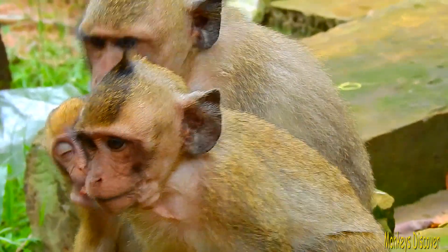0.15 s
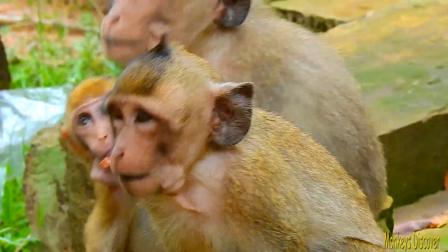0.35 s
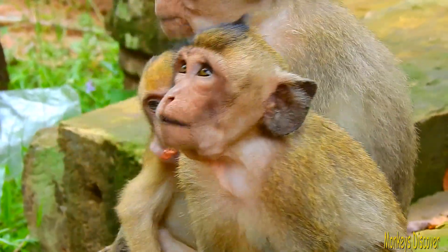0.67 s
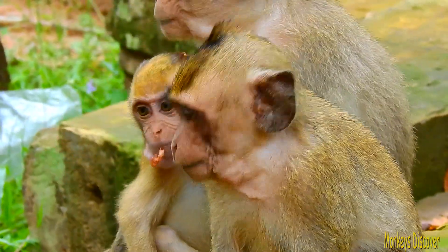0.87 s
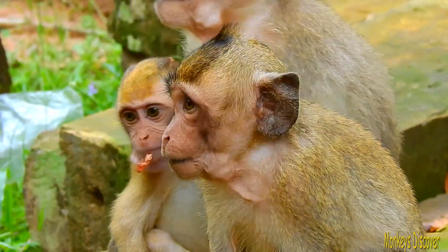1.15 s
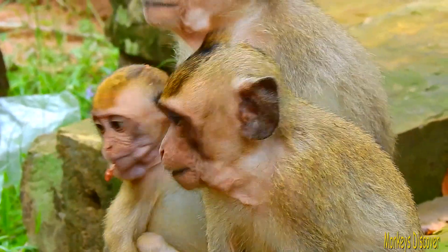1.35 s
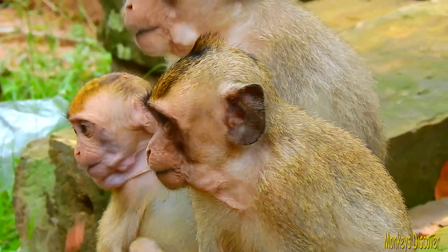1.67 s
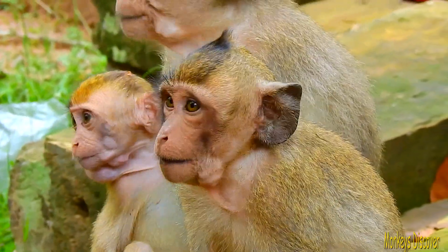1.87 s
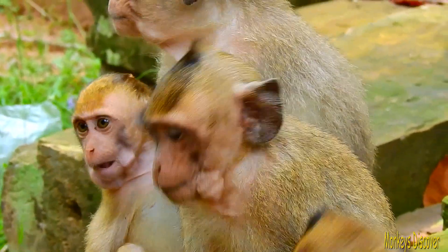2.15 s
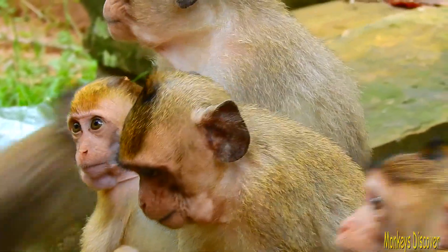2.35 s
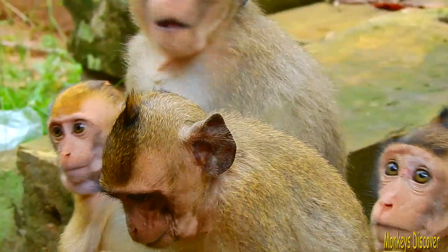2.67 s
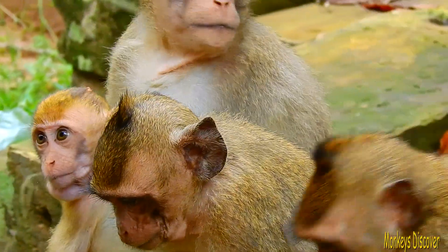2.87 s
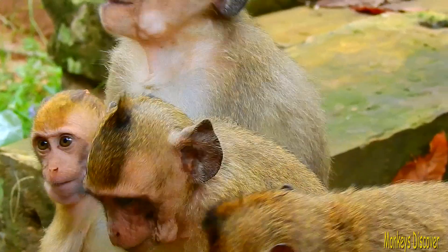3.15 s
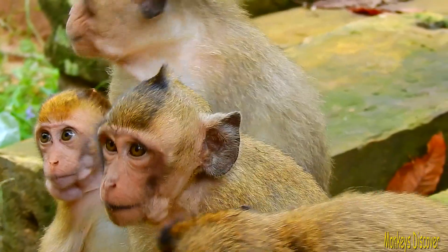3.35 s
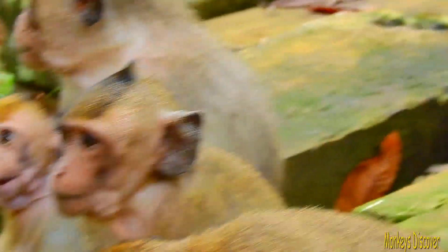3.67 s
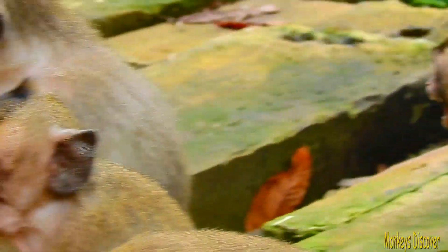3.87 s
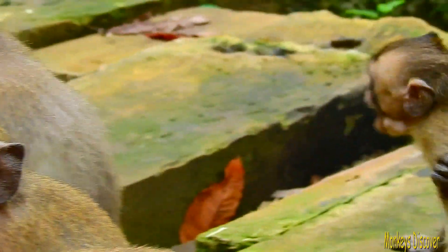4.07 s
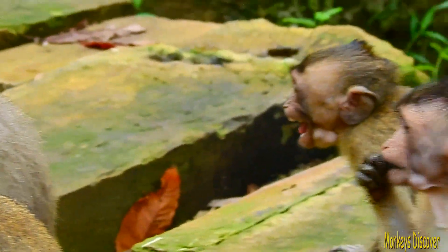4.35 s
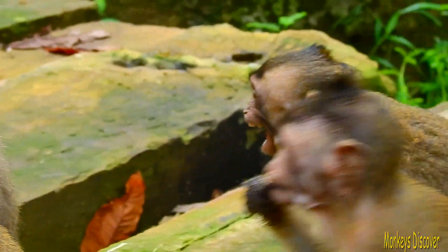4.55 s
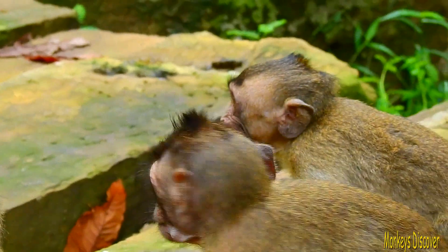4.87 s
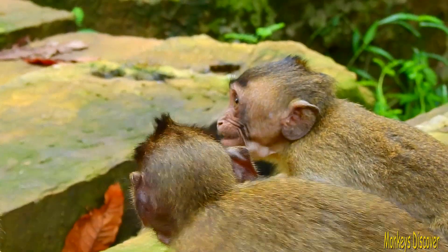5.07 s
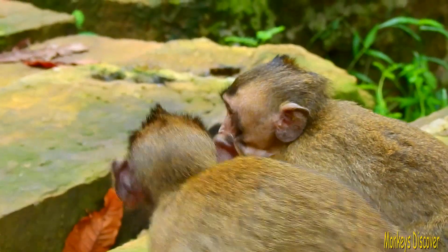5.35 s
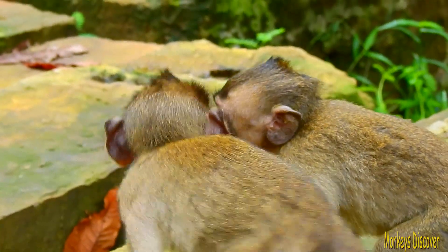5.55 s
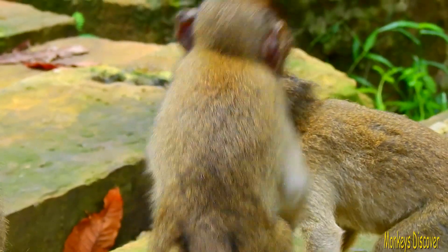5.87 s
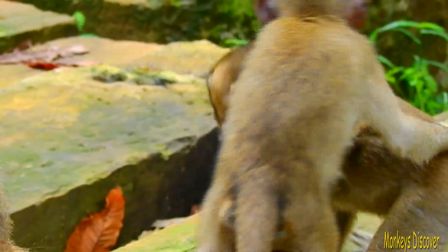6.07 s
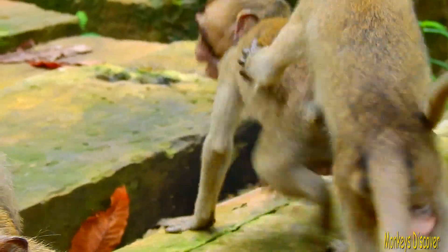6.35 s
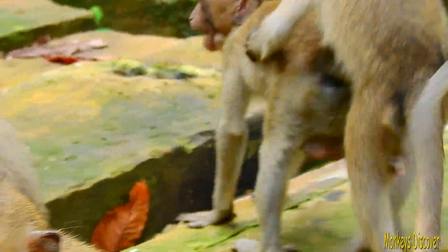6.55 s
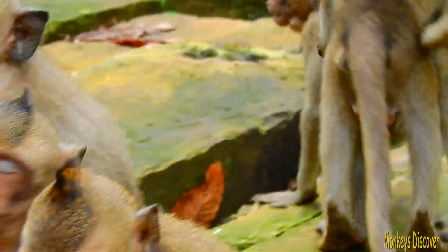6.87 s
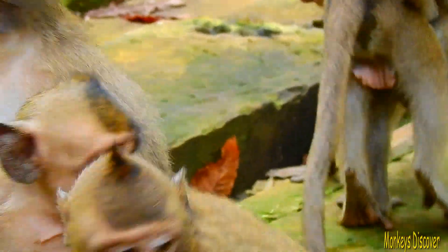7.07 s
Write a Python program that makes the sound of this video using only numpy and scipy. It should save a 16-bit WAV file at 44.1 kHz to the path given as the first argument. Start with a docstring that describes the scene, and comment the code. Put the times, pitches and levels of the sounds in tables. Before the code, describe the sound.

Shrill, wavering monkey squeals grow louder, joined by brief lower calls and light taps, above a distant hum and open-air hiss.

```python
"""Macaques among stone slabs

Young macaques squeal on the right: fast vocal folds give a wavering high whistle, strong-weak cycles
add a half line, chaotic vibration a throaty rasp. Others coo and grunt in the middle, where feet and
hands tap the stone. A far engine idles over open-air hiss; walls and trees give the calls a faint tail."""
import sys
import numpy as np
from scipy import signal
from scipy.fft import rfft, irfft
from scipy.io import wavfile
from scipy.ndimage import uniform_filter1d

SR = 44100
rng = np.random.default_rng(int(sys.argv[2]) if len(sys.argv) > 2 else 0)


def persist_wave(psi):
    """Save psi, clipped to +-1, as 16-bit WAV."""
    counts = np.round(np.clip(psi, -1, 1) * 32767).astype(np.int16)
    wavfile.write(sys.argv[1], SR, np.atleast_2d(counts).T)


N = 317520
TIME_S = np.arange(N) / SR


def from_db(db):
    """Level to gain."""
    return 10 ** (np.asarray(db) / 20)


def rms_one(x):
    """Scale to rms 1."""
    return x / np.sqrt(np.mean(x ** 2) + 1e-20)


def butter(x, order, hz, kind):
    """Butterworth filter."""
    return signal.sosfilt(signal.butter(order, hz, kind, fs=SR, output="sos"), x)


def curves(rows):
    """Rows of (t/s, values...) to one curve per value."""
    times_s, *columns = np.transpose(rows)
    return [np.interp(TIME_S, times_s, column) for column in columns]


def phrases(tables, fade_s):
    """Gate, open during each phrase, and the phrases' curves."""
    gate = np.zeros(N)
    for rows in tables:
        gate[round(rows[0][0] * SR) - 50:round(rows[-1][0] * SR) + 50] = 1
    rows = np.concatenate(tables)
    order = np.argsort(rows[:, 0], kind="stable")
    return uniform_filter1d(gate, max(int(fade_s * SR), 1)), curves(rows[order])


def drift(rate_hz):
    """Low-passed noise, rms 1."""
    r = np.exp(-2 * np.pi * rate_hz / SR)
    return rms_one(signal.lfilter([1], [1, -2 * r, r * r], rng.standard_normal(N + SR))[SR:])


def resonate(x, modes, passes=1):
    """Parallel resonances (f/Hz, width/Hz, level/dB) of alternating sign; more passes, steeper skirts."""
    out = 0
    for k, (hz, width_hz, db) in enumerate(modes):
        r = np.exp(-np.pi * width_hz / SR)
        b = (1 - r * r) / 2 * np.array([1, 0, -1])
        a = [1, -2 * r * np.cos(2 * np.pi * hz / SR), r * r]
        out = out + (-1) ** k * from_db(db) * signal.lfilter(b, a, x)
    return out if passes == 1 else resonate(out, modes, passes - 1)


def moving_band(x, hz, width_hz, order=2):
    """Band round a moving centre: shift to zero, low-pass, shift back; rms 1."""
    carrier = np.exp(2j * np.pi * np.cumsum(hz) / SR)
    baseband = butter(x / carrier, order, width_hz / 2, "low")
    return rms_one(np.real(baseband * carrier))


def partials(hz, lines):
    """Sines on a pitch; lines are (multiple, rms level/dB)."""
    phase = 2 * np.pi * np.cumsum(hz) / SR
    return sum(np.sqrt(2) * from_db(db) * (k * hz < .45 * SR) * np.sin(k * phase) for k, db in lines)


# f/Hz, relative density/dB
AIR_SPECTRUM = [(18, -44), (30, -2), (140, 3), (197, -5.5), (284, -5), (467, -18), (561, -17), (728, -6),
                (830, -19.5), (1230, -23), (3320, -24.5), (4540, -22), (5590, -30.5), (15500, -51)]
# f/Hz, left-right correlation
AIR_CORRELATION = [(60, 0.99), (240, 0.99), (950, 0.9), (3770, 0.36), (15000, -0.03)]


def air(level_db=-43, flicker_db=.8):
    """Far traffic, leaves and insects: stereo noise in flickering half-octave bands."""
    out, edges_hz = 0, 30 * 2 ** np.arange(0, 9.3, .5)
    white = rng.standard_normal((2, 2, N))
    flicker = [drift(31), drift(18), drift(17)]
    tables = np.transpose(AIR_SPECTRUM), np.transpose(AIR_CORRELATION)
    for k, (low, high) in enumerate(zip(edges_hz, edges_hz[1:])):
        mid, side = butter(white[k % 2], 3, [low, high], "band")
        centre_hz = np.sqrt(low * high)
        db, alike = [np.interp(np.log(centre_hz), np.log(hz), values) for hz, values in tables]
        alike = np.clip(alike, 0, 1)
        pair = np.sqrt(1 + alike) * mid + np.sqrt(1 - alike) * side * [[1], [-1]]
        out = out + from_db(db + flicker_db * flicker[k % 3]) * pair
    return from_db(level_db) * rms_one(out)


# f/Hz, width/Hz, level/dB
INSECT_BAND = [(4620, 1000, -60)]


def insects():
    """Far chorus blurred into one band of hiss, partly shared by the channels."""
    (hz, width_hz, db), = INSECT_BAND
    band = butter(rng.standard_normal((3, N)), 2, [hz - width_hz / 2, hz + width_hz / 2], "band")
    return from_db(db) * rms_one(1.2 * band[0] + band[1:])


# f/Hz, width/Hz, relative level/dB
HUM_MODES = [(554, 24, 0.5), (628, 24, -3), (835, 30, 3), (1035.5, 35, 1.5), (1178, 9.7, -32),
             (1697, 12, -0.5)]


def hum_tones(level_db=-58):
    """Faint tones: noise in narrow resonances, each fading in and out on its own."""
    white, swell_db = rng.standard_normal(N), 5 * np.tanh(drift(3))
    tones = sum(from_db(np.roll(swell_db, 40000 * k)) * resonate(white, [mode])
                for k, mode in enumerate(HUM_MODES))
    return from_db(level_db) * rms_one(tones)


# t/s, firing rate/Hz
ENGINE_RATE = [(0, 23.8), (.45, 23.4), (1.35, 24.3), (2.3, 23.6), (3.6, 24.1), (4.95, 23.5), (5.4, 23.9),
               (7.2, 23.4)]
# t/s, level/dB
ENGINE_LEVEL = [(0.0, -41), (0.82, -42.5), (1.26, -39), (2.57, -43.5), (3.05, -39.5), (3.47, -43.5),
                (4.51, -43), (4.911, -43.5), (5.5, -42.5), (6.56, -42), (6.72, -42.5), (7.2, -44)]
# f/Hz, width/Hz, gain per pass/dB
EXHAUST_MODES = [(131.5, 31.4, 0), (275, 50, -4), (392.1, 34.3, -6), (74.5, 48, -11)]


def engine():
    """Far idle: one slightly uneven pulse per firing rings the exhaust."""
    (rate_hz,), (level_db,) = curves(ENGINE_RATE), curves(ENGINE_LEVEL)
    firings = np.cumsum(rate_hz * (1 + .012 * drift(6))) / SR
    pulses = np.diff(np.floor(firings), prepend=0) * from_db(2.53 * rng.standard_normal(N))
    return from_db(level_db) * rms_one(resonate(pulses + 1e-18, EXHAUST_MODES, passes=2))


# f/Hz, level/dB, t60/s
STONE_MODES = [(1780, 0.5, 0.009), (1320, 5.5, 0.0066)]
# t/s, ring and grit gain/dB, thump gain/dB
CONTACTS = [(0.483, -35, -50), (0.511, -25, -50), (0.605, -46, -40.5), (0.674, -27.5, -45),
            (1.398, -21.5, -36.5), (1.725, -31.5, -45), (2.283, -29, -52), (2.886, -31.5, -42),
            (2.98, -36, -40), (3.128, -35, -45), (3.156, -23, -51), (3.171, -27, -27.5),
            (3.193, -21, -33.5), (3.208, -40, -32.5), (3.372, -41, -60), (3.464, -35, -52),
            (3.541, -30.5, -58), (3.936, -37, -72), (5.318, -30, -52), (5.562, -36, -46)]


def taps(thump_hz=548, thump_t60_s=.0084):
    """Hands and feet strike stone: short ring, grit and dull thump."""
    out, t = np.zeros(N + SR), np.arange(SR // 20) / SR
    ring = sum(from_db(db - 60 * t / t60) * np.sin(2 * np.pi * hz * t) for hz, db, t60 in STONE_MODES)
    decay = from_db(-60 * t / thump_t60_s)
    thump = from_db(19.5) * decay * np.sin(2 * np.pi * thump_hz * t)
    attack = 1 - np.exp(-t / .00082)   # padded skin, no hard edge
    grits = 1.74 * decay * butter(rng.standard_normal((len(CONTACTS), len(t))), 2, [900, 3500], "band")
    for (start_s, ring_db, thump_db), grit in zip(CONTACTS, grits):
        tap = from_db(ring_db) * (ring + grit) + from_db(thump_db) * thump
        out[round(start_s * SR):][:len(t)] += attack * tap
    return out[:N]


# start/s, attack/s, length/s, level/dB, drop by the end/dB, f/Hz
SCUFF_EVENTS = [(0.478, .014, 0.61, -47, 22, 1710), (1.148, 0.19, 0.28, -43.5, 20, 1800),
                (1.431, 0.048, 0.19, -41.5, 16, 1270), (2.814, 0.034, 0.22, -49, 11, 1630),
                (5.232, .015, 0.055, -42, 2.5, 2213), (6.969, 0.016, 0.11, -36.5, -4.5, 1130)]


def scuff_shapes(fade_s, rise_db=7):
    """Gate, level and band centre: each scuff swells, then ramps to its end level."""
    shapes = [[(s, db - rise_db, hz), (s + attack_s, db, hz), (s + length_s, db - drop_db, hz)]
              for s, attack_s, length_s, db, drop_db, hz in SCUFF_EVENTS]
    return phrases(shapes, fade_s)


def scuffs():
    """Grunt breath and feet dragging on stone: broad grainy noise."""
    gate, (db, hz) = scuff_shapes(fade_s=.015)
    white = rng.standard_normal(N)
    grain = from_db(2.5 * drift(150))
    body = moving_band(white, hz, width_hz=2600, order=3)
    hiss = resonate(white, [(4400, 2700, -.15)], passes=2)
    return gate * from_db(db) * grain * (body + hiss)


# start/s, turn/s, end/s, start f/Hz, turn f/Hz, end f/Hz, level/dB, octave/dB re fundamental
COO_CALLS = [(4.17, 4.201, 4.3, 801.4, 845, 742, -39, -8),
             (4.302, 4.318, 4.48, 712.2, 680, 587.6, -46, -12.5),
             (5.21, 5.237, 5.285, 800, 1078, 801.5, -44, -4), (5.321, 5.33, 5.345, 996, 991, 797, -45, -8),
             (5.584, 5.597, 5.606, 950, 1104, 1197, -39, -9),
             (5.877, 5.9, 5.908, 1501, 1143, 999, -42, -20),
             (6.199, 6.216, 6.243, 976.7, 1070, 1180, -30.5, -31),
             (6.261, 6.275, 6.302, 1100, 1214, 1060, -33, -19),
             (6.363, 6.421, 6.535, 630, 693, 650, -43, -10),
             (6.539, 6.552, 6.58, 1041, 1106, 1230, -48, -22),
             (6.933, 6.975, 6.982, 1794, 1450, 1400, -41.5, -9),
             (6.984, 7.025, 7.046, 1304, 1045, 950, -28.5, -16),
             (7.045, 7.062, 7.085, 1250, 1168, 1016, -33, -13)]


def coos(rise_db=15, fall_db=15.5):
    """Low coos and grunts swell to a turn, then fade; the breathier, the less steady."""
    shapes = [[(start, start_hz, db - rise_db, octave_db),
               ((2 * start + turn) / 3, (start_hz + turn_hz) / 2, db - rise_db / 4, octave_db),
               (turn, turn_hz, db, octave_db),
               ((turn + 3 * end) / 4, (turn_hz + end_hz) / 2, db - fall_db / 3, octave_db),
               (end, end_hz, db - fall_db, octave_db)]
              for start, turn, end, start_hz, turn_hz, end_hz, db, octave_db in COO_CALLS]
    gate, (hz, level_db, octave_db) = phrases(shapes, fade_s=.0071)
    breath_gate, (breath_db, _) = scuff_shapes(fade_s=.038)
    hoarse = breath_gate * np.clip((breath_db - level_db + 12) / 10, 0, 1)
    shaky_hz = hz * (1 + (.02 + .08 * hoarse) * drift(150))
    flutter_db = (3 + 2.6 * hoarse) * np.tanh(drift(53))
    lines = [(1, 0), (2, octave_db), (3, octave_db - 9), (4, octave_db - 16)]
    return gate * from_db(level_db + flutter_db) * partials(shaky_hz, lines)


# Per phrase: t/s, f/Hz, roughness
SQUEAL_PITCH = [
    [(.5, 3890, 0.89), (.6, 4304, 1.02), (.65, 4660, 0.9), (.67, 4290, 0.76), (.72, 4550, 0.5),
     (.77, 4720, 0.3), (.8, 4330, 0.55), (.82, 4500, 0.65), (.85, 4250, 0.45), (.92, 4100, 0.97),
     (.96, 4370, 0.84), (1.0, 4300, 0.67), (1.1, 4330, 1.05), (1.15, 4420, 0.92), (1.3, 4370, 0.93),
     (1.6, 4530, 0.94), (1.9, 4326, 0.89), (1.96, 4185, 0.7), (2.075, 4017, 0.64), (2.245, 4130, 0.74)],
    [(2.247, 4297, 0.88), (2.29, 4336, 1.03)],
    [(2.372, 3965, 0.75), (2.43, 3797, 1.01), (2.64, 4125, 0.86), (2.68, 3855, 0.68), (2.715, 3662, 0.96),
     (2.75, 3694, 0.3), (2.8, 3673, 0.15), (2.85, 3750, 0.47), (2.88, 4000, 0.31), (2.965, 3900, 0.89),
     (2.98, 3720, .6), (3.0, 3360, 0.6), (3.03, 3313, 0.89), (3.045, 2455, 1.1)],
    [(3.197, 3696, 0.33), (3.211, 3876, 0.1)],
    [(3.212, 3523, 0.41), (3.283, 3757, 0.51), (3.29, 4915, 1.11), (3.335, 5385, 0.87), (3.36, 5150, 0.6),
     (3.4, 5160, 0.32), (3.5, 5126, 0.6), (3.56, 5326, .45), (3.605, 5253, 0.5), (3.61, 4110, 0.65),
     (3.63, 3970, 0.66), (3.7, 4053, 0.48), (3.71, 4740, 0.7), (3.77, 5800, 0.54), (3.82, 5600, 0.6),
     (3.835, 4875, 0.67), (3.88, 5170, 0.82), (3.925, 4840, 0.77), (3.95, 5043, 0.37), (4.0, 4900, 0.43),
     (4.05, 3935, 0.69), (4.058, 4320, 0.44), (4.085, 3150, 0.43), (4.11, 2710, 0.83)],
    [(4.26, 3278, 0.41), (4.272, 3620, 0.42)],
    [(4.274, 3957, 0.38), (4.3, 4427, 0.62), (4.36, 7100, 0.38), (4.39, 7755, 0.22), (4.43, 7450, 0.37),
     (4.475, 5400, 0.6), (4.485, 5126, 1.02), (4.49, 3557, 0.94), (4.51, 3335, 0.82), (4.525, 3402, 0.36),
     (4.545, 3506, 0.16), (4.552, 3475, 0.55), (4.565, 3500, 0.84), (4.6, 3730, 0.88), (4.625, 3800, 0.7),
     (4.64, 4000, 0.29), (4.66, 4694, 0.68), (4.71, 4746, 0.73), (4.725, 4273, 0.84), (4.75, 3620, 1.3),
     (4.772, 3414, 0.57), (4.78, 3397, 0.08), (4.808, 3480, 0.01), (4.815, 3446, 0.63), (4.845, 3444, 0.49),
     (4.855, 3425, 0.26), (4.88, 2915, 0.36), (4.92, 2384, 0.5)],
    [(5.585, 2853, 0.45), (5.615, 2920, 0.38), (5.64, 4400, 0.78), (5.665, 3014, 1.02), (5.7, 3337, 0.57),
     (5.755, 3487, 0.63), (5.77, 3560, 0.13), (5.8, 3730, 0.02), (5.83, 3530, 0.14), (5.845, 3440, .3),
     (5.868, 3420, 0.73), (5.88, 2745, 0.39), (5.91, 2060, 0.75)],
    [(6.46, 3428, 0.55), (6.506, 3310, 0.47)],
    [(6.507, 3103, 0.73), (6.54, 3970, 0.57), (6.58, 4124, 0.64), (6.585, 4983, 0.37), (6.615, 5600, 0.54),
     (6.635, 5750, 0.1), (6.655, 5450, 0.26), (6.685, 5000, 0.37), (6.7, 4180, 0.45), (6.72, 3426, 1.06),
     (6.74, 3350, 0.91), (6.746, 3317, 0.2), (6.778, 3450, 0.2), (6.783, 3490, 0.1), (6.795, 3450, 0.54),
     (6.8, 2797, 0.58), (6.83, 3260, 0.67), (6.86, 3456, 0.63), (6.885, 3564, 0.68)],
]


def squeal_voice(flat_share=.4, slide_s=.015):
    """Gate, pitch and roughness; each phrase starts flat and slides up."""
    gate, (hz, rough) = phrases(SQUEAL_PITCH, fade_s=.0085)
    starts_s = np.array([rows[0][0] for rows in SQUEAL_PITCH])
    current = np.maximum(np.searchsorted(starts_s, TIME_S) - 1, 0)
    age_s = np.maximum(TIME_S - starts_s[current], 0)
    return gate, hz * (1 - flat_share * np.exp(-age_s / slide_s)), np.clip(rough, .05, .99)


# Per breath: t/s, level/dB, mouth/dB re level
SQUEAL_EFFORT = [
    [(0.495, -41, -23), (0.509, -33.5, -3.5), (0.521, -32.5, 3.5), (0.543, -43.5, 4.5), (0.635, -49, -3.5),
     (0.653, -40.5, -3), (0.709, -45.5, 3), (0.723, -39.5, -2.5), (0.817, -52, 7), (0.839, -46, -1),
     (0.859, -52.5, 6), (0.909, -47, 5), (0.997, -48.5, 2), (1.015, -56, 4), (1.065, -46, 0.5),
     (1.253, -55, -1), (1.345, -46.5, -9.5), (1.377, -69.5, 7), (1.385, -54, -2)],
    [(1.386, -60, -6), (1.396, -55, -5), (1.42, -58, -1), (1.484, -45.5, -8.5), (1.558, -52, 0),
     (1.762, -50, -0.5), (1.9, -45.5, -7), (2.044, -38, -8.5), (2.068, -29, -11.5), (2.114, -36.5, -3.5),
     (2.138, -34, -14), (2.148, -44.5, -0.5), (2.242, -40.5, -3), (2.25, -31, -4.5), (2.264, -22, -12),
     (2.276, -36, -21), (2.288, -51, -4), (2.3, -36.5, -4)],
    [(2.37, -53, -10), (2.384, -24, -58), (2.394, -22.5, -7), (2.414, -37.5, 7.5), (2.434, -38, -1),
     (2.508, -43, -1.5), (2.638, -34, -0.5), (2.688, -28, -11.5), (2.718, -30.5, -3), (2.724, -32, 2),
     (2.782, -28.5, 0), (2.802, -38, 7.5), (2.952, -42, 6.5), (2.974, -29, -1), (3.014, -32.5, 4.5),
     (3.026, -16.5, -3.5), (3.038, -29, -12), (3.054, -61, 4), (3.07, -40.5, 6)],
    [(3.196, -34, -16), (3.204, -28, -19), (3.221, -20.5, -1), (3.383, -39, -0.5), (3.431, -31.5, -4),
     (3.571, -35.5, -0.5), (3.651, -18.5, -10.5), (3.701, -22, -9), (3.723, -30.5, -7), (3.805, -35.5, 0),
     (3.845, -29, -3), (3.873, -23.5, -6), (3.949, -28.5, -5), (3.969, -31.5, 1), (4.061, -19.5, -8),
     (4.075, -14, -40), (4.087, -27, 6.5), (4.095, -34.5, -6), (4.13, -40, -11)],
    [(4.26, -35, -18), (4.272, -32, -28), (4.28, -17.5, -8), (4.284, -21.5, -6.5), (4.35, -39.5, 0.5),
     (4.39, -48, -1), (4.422, -47, 2), (4.456, -34, -1), (4.496, -20.5, -7.5), (4.512, -21.5, -10),
     (4.626, -20, -4.5), (4.64, -21, -5.5), (4.702, -29, -7.5), (4.717, -25, -6), (4.724, -17, -18),
     (4.744, -16, -13.5), (4.784, -18.5, -8.5), (4.804, -22.5, -2), (4.846, -16, -15.5), (4.896, -29, 5.5),
     (4.916, -42, 10), (4.94, -33, -4)],
    [(5.58, -61, -18), (5.604, -44.5, -1), (5.624, -27.5, -24), (5.638, -24.5, -6.5), (5.658, -19.5, -14.5),
     (5.668, -35, -9), (5.676, -23, -28), (5.682, -29, -1), (5.738, -23.5, -3.5), (5.76, -22.5, -9),
     (5.768, -26, 9), (5.798, -19.5, -3.5), (5.826, -29.5, 5), (5.836, -19, -9), (5.86, -29.5, -1),
     (5.872, -22, -23), (5.884, -43, 14), (5.902, -66, 22), (5.93, -52, 7)],
    [(6.485, -41, -6), (6.493, -61, -16), (6.503, -22.5, -51), (6.508, -31, -29)],
    [(6.509, -46, -36), (6.515, -22, -5), (6.531, -26, 8.5), (6.547, -21.5, -4), (6.581, -30.5, 11),
     (6.589, -29.5, 3), (6.641, -28, 2), (6.694, -33.5, 5), (6.702, -16.5, -15.5), (6.731, -21, -6),
     (6.777, -20, -4.5), (6.799, -20.5, -4), (6.861, -24.5, 6), (6.881, -37.5, 9.5), (6.93, -45, 12.5)],
]
# t/s, overtones/dB, lip hiss/dB re mouth, top/dB, mouth rasp/dB re mouth
SQUEAL_TREBLE = [(.5, 2.5, -12.5, -14, 5.5), (.7, -0.5, -5, -4, -2.5), (1.199, -6, -10, -1, 3.5),
                 (2.05, -5, -5, 0, 3.5), (2.3, -4, -17, -5, -0.5), (2.6, -7.5, -10.5, 2, -2),
                 (2.72, 9, -6, -2, -1), (2.8, -1.5, -2.5, 7, 9.5), (3.05, -3.5, -19, 2, -2),
                 (3.2, -11, -9, -37, 3), (3.3, -11, -5, -31, 1), (3.399, 0, 16.5, -35, 8),
                 (3.58, -3, 5.5, -29, 2), (3.701, -11.5, 1, -12, 7), (3.9, -10.5, -1, -6.5, 4),
                 (4.1, -23, -16, -6, 1.5), (4.29, -11, -11, -16, 5), (4.315, 4, -1, -16, 4),
                 (4.35, -15, -4, -16, 8), (4.45, -17, -2, -16, 4), (4.6, -18, -25, 4, 2.5),
                 (4.7, -13, -7, -18, 6.5), (4.85, -1.5, -47, -30, -3), (5.65, -27, -20, -21, 9.5),
                 (5.801, -5, -15, -11, 4.5), (6.52, -16, -19, -28, 4.5), (6.63, -35, -19, -30, -2),
                 (6.675, -36, -22, -25, 4), (6.7, -7.5, -34, -10, 1.5), (6.751, -33, -38, -25, 6.5),
                 (6.9, -29, -21, -17, -1)]


def squeal_levels(fade_s):
    """Breath gate, effort curves and treble curves."""
    gate, effort = phrases(SQUEAL_EFFORT, fade_s)
    return gate, effort, curves(SQUEAL_TREBLE)


# start/s, length/s
TRIPLED_CYCLES = [(3.29, .26), (3.61, .1), (6.785, .1)]


def rough_folds(pitch_hz, effort_db):
    """Folds repeat only every fourth or third beat: unsteady lines between overtones, in breath noise."""
    tripled, _ = phrases([[(s, 0), (s + length_s, 0)] for s, length_s in TRIPLED_CYCLES], fade_s=0)
    beats = 4 - tripled
    hz = pitch_hz / beats
    jitter = (.045 - .03 * tripled) * drift(150)
    phase = 2 * np.pi * np.cumsum(hz * (1 + jitter)) / SR
    flicker_db = 7 * np.tanh(drift(22))
    lines = 0
    for k in range(2, 13):
        present = (k * hz < .4 * SR) * (k % beats > 0) * (k > beats / 2)
        lines = lines + present * from_db(np.roll(flicker_db, 9000 * k)) * np.cos(k * phase + k * k)
    voiced = np.clip((effort_db + 52) / 24, .25, .5 + .08 * tripled)   # soft passages are mostly breath
    return voiced * rms_one(lines) + np.sqrt(1 - voiced ** 2) * rng.standard_normal(N)


# start/s, length/s, start f/Hz, end f/Hz, wide band/dB re level, narrow band/dB re level
HARSH_BURSTS = [(0.496, 0.028, 2300, 3770, -1, -12), (2.25, 0.021, 3130, 4200, -8, -13),
                (3.38, 0.173, 3450, 3400, -25, -6.5), (0.901, 0.11, 5200, 4400, -1, -5),
                (2.379, 0.013, 3180, 3430, -14, 1), (2.631, .15, 4300, 3930, -50, 4.5),
                (2.816, 0.14, 5050, 4950, -1, -10), (3.854, 0.094, 4185, 5370, -13, -15),
                (4.476, 0.059, 4110, 3600, -13, -6.5), (4.545, 0.058, 2980, 3268, -21, -2.5),
                (4.628, 0.1, 3730, 3800, -42, -32), (4.722, .053, 3700, 2780, -16, -23),
                (4.81, 0.026, 3050, 3098, -13.5, -17), (5.625, 0.025, 3137, 3600, -4.5, -8.5),
                (5.674, 0.035, 3310, 3706, -26, 4), (6.486, 0.025, 2784, 3254, -19, -5),
                (6.709, 0.033, 3302, 2497, -20, -3), (6.736, 0.015, 2570, 2553, -38, -19),
                (6.776, 0.032, 3000, 2680, -10, -1)]


def bursts(folds):
    """Harsh moments: a wide and a narrow gliding band of the fold sound."""
    shapes = [[(s, start_hz, *db), (s + length_s, end_hz, *db)]
              for s, length_s, start_hz, end_hz, *db in HARSH_BURSTS]
    gate, (hz, wide_db, narrow_db) = phrases(shapes, fade_s=.015)
    wide = from_db(wide_db) * moving_band(folds, hz, width_hz=1570)
    narrow = from_db(narrow_db) * moving_band(folds, hz, width_hz=430)
    return gate * (wide + narrow)


# Resonances: f/Hz, width/Hz, gain per pass/dB
MOUTH_MODES = [(5710, 2100, 49), (7660, 2600, 34.5)]
LIP_MODES = [(9000, 3200, 0), (11200, 1800, -4)]
TEETH_MODES = [(10600, 8800, 0)]


def rasp(throat_rest_hz=4250):
    """Chaotic fold vibration rings throat, mouth, teeth and lips."""
    _, hz, rough = squeal_voice()
    gate, (level_db, mouth_db), (overtones_db, lip_db, top_db, rasp_db) = squeal_levels(fade_s=.0026)
    folds = rough_folds(hz, level_db)
    follow = np.where(hz < throat_rest_hz, .54, .18)   # share of the pitch swing
    throat = moving_band(folds, throat_rest_hz + follow * (hz - throat_rest_hz), width_hz=716)
    mouth = from_db(rasp_db) * rms_one(resonate(folds, MOUTH_MODES, passes=2))
    teeth = from_db(top_db) * rms_one(resonate(folds, TEETH_MODES, passes=2))
    lips = rms_one(resonate(folds, LIP_MODES, passes=3))
    hiss = from_db(lip_db - 1.5 + 3.3 * np.tanh(drift(23))) * (lips + teeth)
    octave_breath = from_db(overtones_db - 1.5) * moving_band(folds, np.minimum(2 * hz, 15000), 860)
    tract = throat + from_db(mouth_db) * (mouth + hiss + octave_breath)
    sound = butter(rough * tract + bursts(folds), 4, 1900, "high")
    return gate * from_db(level_db + .45 * drift(187)) * sound


# start/s, length/s, half line/dB re level, upper half lines/dB re level
STRONG_WEAK_CYCLES = [(3.188, 0.024, -23, -24), (4.521, 0.037, -13.5, -20), (4.766, 0.087, -21.5, -34),
                      (4.876, 0.082, -19, -4), (5.615, 0.031, -12.5, -22), (6.509, 0.038, -34, -33),
                      (6.586, 0.073, -14.5, -15), (6.723, 0.068, -19, -30)]


def whistle(mouth_edge_hz=5300, dropout_db=9):
    """Fold edges vibrate fast, less steadily when rough; strong-weak cycles add half multiples."""
    gate, hz, rough = squeal_voice()
    breath_gate, (level_db, mouth_db), (overtones_db, _, top_db, _) = squeal_levels(fade_s=.003)
    spans = [[(s, *db), (s + length_s, *db)] for s, length_s, *db in STRONG_WEAK_CYCLES]
    half_gate, (half_db, upper_db) = phrases(spans, fade_s=.032)
    shaky_hz = hz * (1 + (.008 + .022 * rough ** 2) * drift(220) + .009 * drift(35))
    line_db = mouth_db * np.clip((hz - mouth_edge_hz) / 400, 0, 1)   # a high pitch rings in the mouth
    octave_db = mouth_db + overtones_db + 10.3 * rough ** 2 - 3
    gaps_db = [2 - dropout_db * np.clip(drift(30), 0, 2) for _ in range(3)]
    harmonics = partials(shaky_hz, [(1, line_db + rough * gaps_db[0]),
                                    (2, octave_db + gaps_db[1]),
                                    (3, octave_db - 14.5 + top_db + gaps_db[2]),
                                    (4, octave_db - 28 + top_db)])
    rolloff_db = 2 + 4 * np.maximum(hz - 3500, 0) / 1000
    halves = half_gate * partials(shaky_hz, [(.5, half_db), (1.5, upper_db), (2.5, upper_db - rolloff_db)])
    flutter_db = (2.6 + 5.85 * rough) * np.tanh(drift(150))
    envelope = gate * breath_gate * np.sqrt(1 - rough ** 2) * from_db(level_db + flutter_db)
    return envelope * (harmonics + halves)


# f/Hz, left level/dB re right, lag/rad
BODY_SHADOW = [(1000, 2, 0.21), (2620, -5, 0), (3960, -6, 0.99), (5170, -9.5, 0), (7200, -16, 0.063),
               (8900, -9.5, 0), (12000, -8, 0), (15000, -14, 0)]


def shadow(x):
    """The left microphone port lies in the body's shadow."""
    hz, db, lag_rad = np.transpose(BODY_SHADOW)
    bins_hz = np.arange(N // 2 + 1) * SR / N
    response = from_db(np.interp(bins_hz, hz, db)) * np.exp(-1j * np.interp(bins_hz, hz, lag_rad))
    return irfft(rfft(x) * response, N)


def tail(x, level_db=-4, near_t60_s=.033, far_t60_s=1.29):
    """Echoes from near slabs, then far walls and trees: decaying stereo noise."""
    t = np.arange(int(1.5 * SR)) / SR
    near, far = from_db(-60 * t / near_t60_s), from_db(-60 * t / far_t60_s)
    echoes = rng.standard_normal((2, len(t))) * (far + from_db(27) * near) * np.minimum(t / .0066, 1)
    echoes += from_db(8.5) * near * butter(echoes, 2, 8900, "high")   # near stone scatters treble most
    echoes *= from_db(level_db) / np.sqrt(np.sum(echoes ** 2, axis=1, keepdims=True))
    return signal.fftconvolve(x[None], echoes, axes=1)[:, :N]


def scene():
    """Squeals right; coos, scuffs and taps centred; echoes and background around them."""
    squeal = whistle() + rasp()
    middle = coos() + scuffs() + taps()
    right = from_db(1.5) * squeal
    background = engine() + hum_tones() + insects() + air()
    return np.array([shadow(right), right]) + middle + tail(squeal + .25 * middle) + background


def record(dry, stopband_hz=15950):
    """Microphone: deepest bass lost, top cut steeply."""
    dry = butter(dry, 6, 44, "high")
    return signal.sosfilt(signal.cheby2(20, 70, stopband_hz, fs=SR, output="sos"), dry)


dry = scene()
out = record(dry)
persist_wave(out)
```